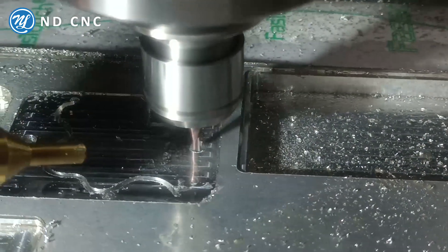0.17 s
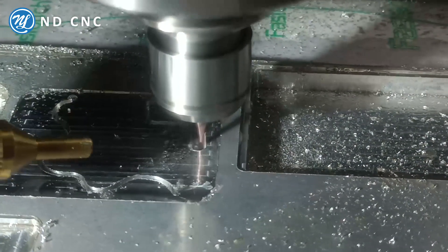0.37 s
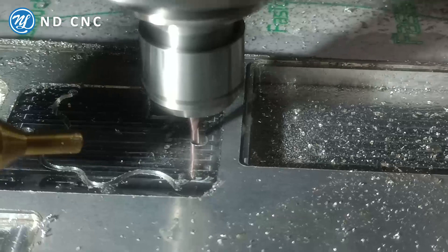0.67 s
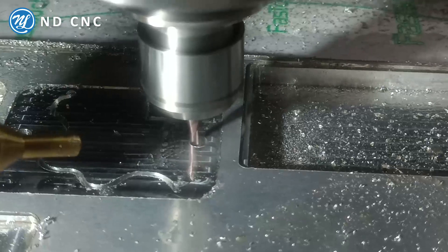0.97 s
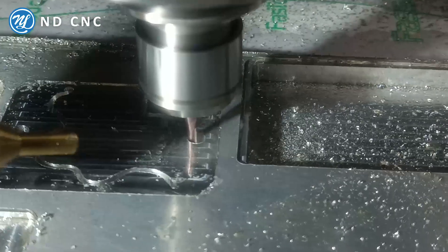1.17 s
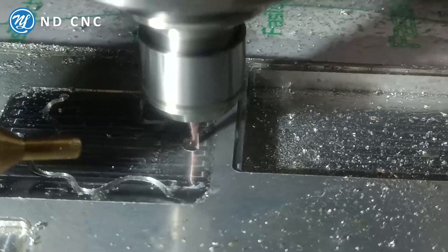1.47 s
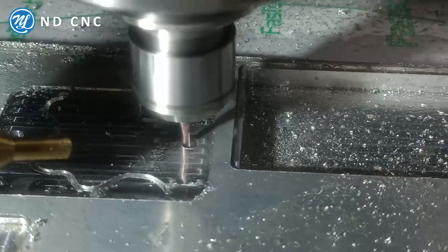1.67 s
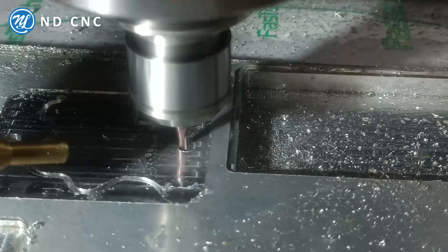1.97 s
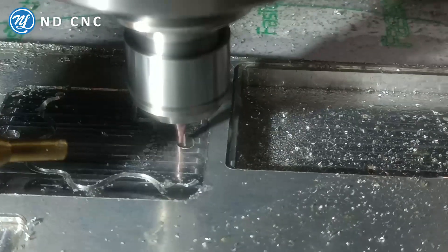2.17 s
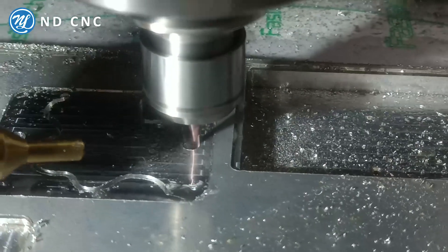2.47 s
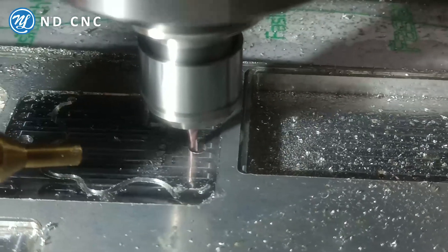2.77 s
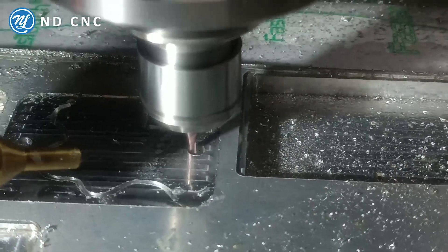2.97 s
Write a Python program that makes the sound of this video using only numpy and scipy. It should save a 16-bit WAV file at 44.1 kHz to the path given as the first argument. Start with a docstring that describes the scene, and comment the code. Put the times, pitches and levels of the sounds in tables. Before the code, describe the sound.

A shrill air-jet hiss with thin whistling resonances runs steadily for about three seconds at a metal cutter. Beneath it a steady mid-low spindle hum swells near 0.2, 1.3 and 2.3 seconds. Dry, static-like pops and ticks crackle irregularly, densest before 0.6 and again after 2. Faint dull knocks fall between 0.3 and 1.7. Close, echoless, mostly right; the left has faint mains buzz and soft noise.

```python
"""A small end mill sweeps to and fro in a metal pocket: its spindle hums and swells once per pass as
the cutter bites. An air nozzle hisses at the cut, as coloured noise with narrow whistling resonances.
Dry crackle like static, probably electrical, sits on top as very short pulses, with a few dull knocks.
Nearly all is in the right channel; the left holds only a faint mains buzz, soft noise and
a trace of the machine. The recorder cuts the top steeply."""
import sys
import numpy as np
from scipy import signal
from scipy.fft import rfft, irfft
from scipy.io import wavfile
from scipy.ndimage import uniform_filter1d

SR = 44100
rng = np.random.default_rng(int(sys.argv[2]) if len(sys.argv) > 2 else 0)


def to_wav(sig):
    """Store sig (one row per channel, or 1-D mono) as 16-bit WAV at the path in sys.argv[1].

    Samples outside -1..1 are clipped; the rate is SR.
    """
    pcm = np.clip(np.atleast_2d(sig), -1, 1) * 32767
    pcm = np.round(pcm).astype(np.int16)
    wavfile.write(sys.argv[1], SR, pcm.T)  # frames by channels


N = 137592  # length in samples

# Noise floor of the left channel. Each row: frequency in Hz, level in dB per Hz.
LEFT_NOISE = [(20, -86), (70, -90), (150, -91), (500, -99), (1500, -101), (5000, -102), (11000, -108),
              (15500, -108)]
# Mains buzz on the left. Each row: multiple of the fundamental, RMS level in dB.
BUZZ_PARTIALS = [(1, -66.5), (2, -74), (3, -94), (4, -73), (5, -84), (6, -75), (7, -80), (8, -87), (9, -89),
                 (10, -80)]
# Soft low knocks of the machine. Each row: start in seconds, level in dB before the decay.
KNOCKS = [(0.267, -32), (0.77, -32), (0.858, -36), (1.278, -35), (1.575, -36), (1.698, -39)]
# Full-bodied pops of the crackle. Each row: time in seconds, signed relative height.
POPS = [(.0228, 0.66), (.0932, 0.69), (.0993, 0.64), (.1231, -0.7), (.1729, -0.55), (.3026, 0.62),
        (.3305, 0.56), (.3527, -0.64), (.38, 0.63), (.392, 0.65), (.4021, 0.69), (.4028, -0.59),
        (.4143, 0.66), (.4229, 0.56), (.4249, -0.52), (.4505, 0.59), (.5034, 0.65), (.5328, 0.64),
        (.5801, -0.59), (.6939, -0.62), (.821, 0.7), (.9825, -0.6), (1.0631, -0.62), (1.091, -.8),
        (1.0911, -0.37), (1.4018, -0.6), (1.942, -0.63), (2.0923, -0.57), (2.0934, -0.65), (2.2032, 0.71),
        (2.2633, 0.68), (2.3016, -0.59), (2.3518, -0.52), (2.3529, 0.61), (2.5944, -0.67), (2.8692, 0.63),
        (2.9229, 0.56), (2.9616, 0.71), (2.992, 0.55), (2.9942, 0.63)]
# Thin ticks that swing straight back. Each row: time in seconds, signed relative height.
TICKS = [(.0234, -0.34), (.0627, -0.93), (.0638, -.88), (.0708, -.75), (.3633, 0.74), (.4024, 0.51),
         (.4331, 0.99), (.7537, -0.84), (1.1806, -.7), (1.2128, -0.64), (2.2335, 0.7), (2.4011, -1.03),
         (2.402, 0.35)]
# Body of the air jet. Each row: frequency in Hz, level in dB per Hz.
JET_BODY = [(20, -94), (55, -82), (100, -72), (260, -74), (1100, -74), (2000, -70.5), (3200, -71.5),
            (3900, -66), (4550, -64), (4950, -72), (5500, -69), (6500, -65), (7500, -64), (7800, -71),
            (8700, -78), (11400, -76)]
# Shrill top of the air jet. Each row: frequency in Hz, level in dB per Hz.
JET_TOP = [(11500, -76.5), (11700, -65.5), (12750, -65), (13050, -58.5), (14000, -57.8), (14800, -56.8),
           (15700, -57.8)]
# Whistling resonances of the jet on the cutter. Each row: centre in Hz, width in Hz, lift in dB.
WHISTLES = [(6810, 70, 6), (7090, 80, 3), (7340, 70, 2.5), (13206, 110, 5), (13380, 90, 3.5),
            (13940, 70, 2), (14303, 70, 5.5), (14513, 85, 4), (15561, 80, 3), (15715, 50, 3.5)]

MAINS_HZ = 99.5  # fundamental of the buzz
KNOCK_HZ, KNOCK_DECAY_S = 137, 0.0085
POP_DB, POP_DECAY_S = 2.5, .000055
TICK_DB, TICK_HZ, TICK_DECAY_S = 1.5, 8800, .000065
FIZZ_PER_S, FIZZ_DB = 70, -19
DRIFT_DB, DRIFT_HZ = .15, 4  # spread and rate of the drift in jet level
SPINDLE_HZ, OCTAVE_DB = 436.5, -55
HUM_DB, BITE_DB, WAVER_DB = -41.3, 6.2, .9  # hum at no load, lift at full load, spread of the waver
FIRST_BITE_S, PASS_S = .225, 1.053  # the cutter bites once per pass
ATTACK_S, HOLD_S, RELEASE_S = .035, .3, .16
LEAK_DB, LEFT_JET_DB = -37.5, -37.5  # hum and hiss on the left, relative to the right
TOP_HZ = 15800


def undb(db):
    """Decibels to gain."""
    return 10 ** (np.asarray(db) / 20)


def walk(rate):
    """Slow random wander with a spread of 1, from random steps (rate per second) smoothed twice."""
    step = int(SR / rate)
    stairs = np.repeat(rng.standard_normal(N)[:N // step + 1], step)
    smooth = uniform_filter1d(uniform_filter1d(stairs, step), step)[:N]
    return (smooth - smooth.mean()) / smooth.std()


def noise(points, peaks=()):
    """Noise with a broad colour, in dB per Hz, and narrow resonances."""
    freq = np.maximum(np.fft.rfftfreq(N, 1 / SR), 1)
    hz, db = np.array(sorted(points)).T
    colour = np.interp(np.log(freq), np.log(hz), db)
    for centre, width, lift in peaks:
        colour = colour + lift / (1 + (2 * (freq - centre) / width) ** 2)
    white = rfft(rng.standard_normal(N))
    return irfft(white * undb(colour), N) * np.sqrt(SR / 2)  # sqrt makes the levels per Hz


def spikes(table, decay_s, ring_hz=0):
    """Sudden jumps that die within a fraction of a millisecond."""
    jumps = np.zeros(N)
    for start, height in table:
        jumps[int(np.clip(round(start * SR), 0, N - 1))] += height
    age = np.arange(64) / SR
    pulse = np.exp(-age / decay_s) * np.cos(2 * np.pi * ring_hz * age)
    return np.convolve(jumps, pulse)[:N]


def line_noise(t):
    """Faint mains buzz, a sum of harmonics, over a soft noise floor."""
    buzz = 0
    for multiple, db in BUZZ_PARTIALS:
        buzz = buzz + undb(db) * np.sin(2 * np.pi * (multiple * MAINS_HZ * t + rng.random()))
    return np.sqrt(2) * buzz + noise(LEFT_NOISE)


def knocks(t):
    """Dull thumps: a low sine, heavily damped."""
    thumps = np.zeros(N)
    for start, db in KNOCKS:
        age = np.maximum(t - start, 0)
        thumps += undb(db) * np.exp(-age / KNOCK_DECAY_S) * np.sin(2 * np.pi * KNOCK_HZ * age)
    return thumps


def crackle():
    """Dry pops and ticks, short pulses with no room around them, and a random fizz of tiny ticks."""
    when, size = rng.random(N), rng.standard_normal(N)
    fizz_table = [(i / SR, size[i]) for i in np.flatnonzero(when < FIZZ_PER_S / SR)]
    pops = undb(POP_DB) * spikes(POPS, POP_DECAY_S)
    ticks = undb(TICK_DB) * spikes(TICKS, TICK_DECAY_S, TICK_HZ)
    fizz = undb(FIZZ_DB) * spikes(fizz_table, TICK_DECAY_S, TICK_HZ)
    return pops + ticks + fizz


def air_jet():
    """A steady, very bright hiss: turbulence as coloured noise whose level drifts slightly."""
    return noise(JET_BODY + JET_TOP, WHISTLES) * undb(DRIFT_DB * walk(DRIFT_HZ))


def spindle(t):
    """One tone and its faint octave; the tone swells each time the cutter bites."""
    corners = np.cumsum([0, ATTACK_S, HOLD_S, RELEASE_S])
    load = np.interp((t - FIRST_BITE_S) % PASS_S, corners, [0.14, 1, 0.8, 0.16])
    speed = SPINDLE_HZ * (1 + 0.00033 * walk(7.5))  # pitch wanders very slightly
    phase = 2 * np.pi * np.cumsum(speed) / SR
    tone = undb(HUM_DB + BITE_DB * load + WAVER_DB * walk(21.7)) * np.sin(phase)
    octave = undb(OCTAVE_DB + 0.84 * walk(12.72)) * np.sin(2 * phase)
    return np.sqrt(2) * (tone + octave)  # sqrt(2): levels are RMS


def scene():
    """Machine and crackle on the right; a trace of hum and hiss joins the buzz on the left."""
    t = np.arange(N) / SR
    hum = spindle(t)
    left = line_noise(t) + undb(LEAK_DB) * hum + undb(LEFT_JET_DB) * air_jet()
    right = air_jet() + hum + knocks(t) + crackle()  # its hiss is independent of the left
    return np.array([left, right])


def record(dry):
    """The recorder cuts the top steeply: a linear-phase low-pass on both channels."""
    lowpass = signal.firwin(801, TOP_HZ, fs=SR, window="blackman")
    return signal.fftconvolve(dry, lowpass[None], mode="same", axes=1)


dry = scene()
out = record(dry)
to_wav(out)
```